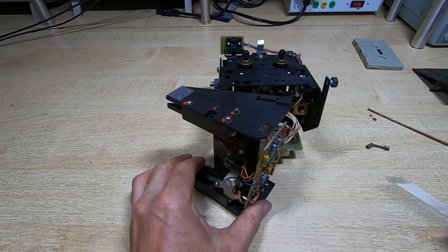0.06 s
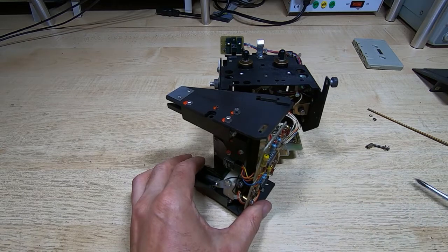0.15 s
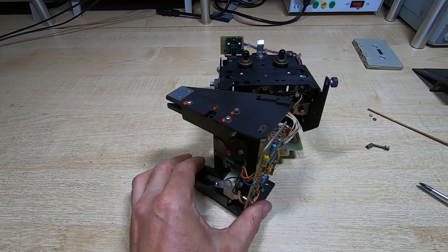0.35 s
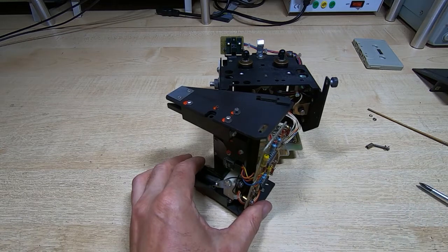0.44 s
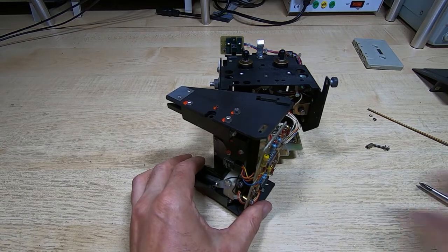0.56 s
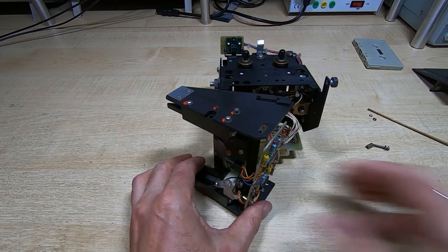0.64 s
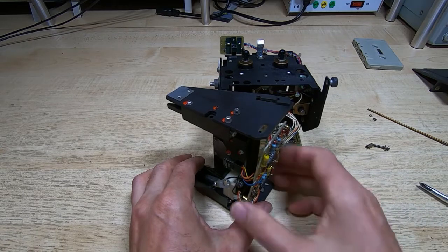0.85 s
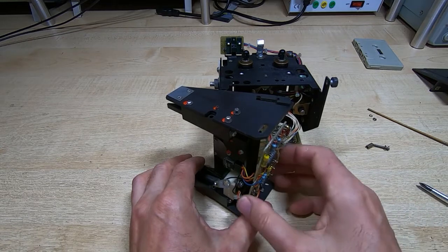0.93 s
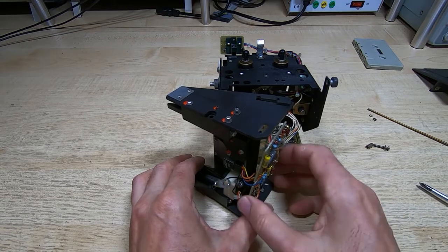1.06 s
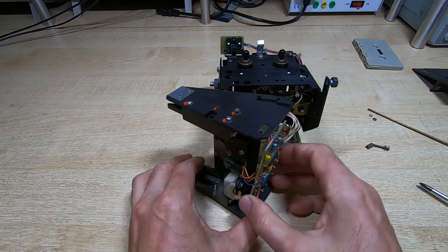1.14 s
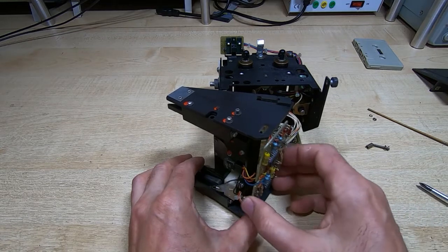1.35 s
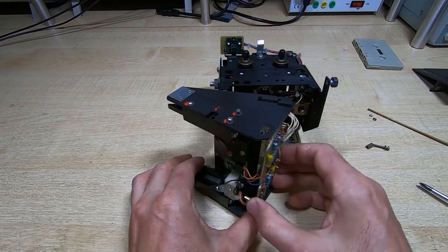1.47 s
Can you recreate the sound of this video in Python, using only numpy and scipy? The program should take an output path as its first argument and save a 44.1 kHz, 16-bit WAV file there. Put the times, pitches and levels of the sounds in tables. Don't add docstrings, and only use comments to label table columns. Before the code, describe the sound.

Close up in a small workshop room, a screwdriver is laid on wood, clicking sharply and then clacking louder. Soft hand rustle follows, with tiny metal ticks and a brief plate rattle over quiet hiss and rumble.

```python
import sys
import numpy as np
from scipy import signal
from scipy.fft import rfft, irfft
from scipy.io import wavfile
from scipy.ndimage import uniform_filter1d

SR = 44100
rng = np.random.default_rng(int(sys.argv[2]) if len(sys.argv) > 2 else 0)


def voltage_ratio(decibels):
    exponent = np.asarray(decibels, float) / 20
    return 10 ** exponent


def transcribe(u):
    v = np.clip(np.atleast_2d(u).T, -1, 1)
    q = np.round(v * 32767).astype(np.int16)
    wavfile.write(sys.argv[1], SR, q)


N = 66150

# (frequency [Hz], level per Hz [dB])
HISS_COLOUR = [(8.8, -22.5), (15, -0.5), (65, -7.5), (179, -15), (483, -22), (1340, -27.5), (1790, -30.5),
               (10000, -37), (16000, -39)]
HISS_DB, HISS_FLICKER_DB = -42.5, -1
HUM_HZ, HUM_DB, HUM_WOBBLE = 50.1, -41, 0.42

# (frequency [Hz], time to fall 60 dB [s])
ROOM_DECAY = [(250, 0.34), (500, 0.29), (1000, .25), (2000, 0.24), (4000, 0.14), (8000, 0.11),
              (16000, 0.12)]
ROOM_RISE_S, ROOM_GRAIN_DB = 0.00064, 3.5

# (time [s], level [dB])
RUSTLE_LEVEL = [(0, -71), (.12, -62), (.2, -55), (.3, -55), (0.552, -70), (.68, -55), (.85, -55.5),
                (.95, -70), (1.08, -57), (1.15, -47.5), (1.22, -64), (1.35, -62), (1.5, -64)]
RUSTLE_HZ, RUSTLE_OCTAVES, RUSTLE_GRAIN_DB = 2340, 1.28, 4

# (time [s], peak level [dB], pitch [Hz], time to fall 60 dB [s], snap level [dB])
PART_TICKS = [(.9232, -35, 3970, 0.006, 0), (1.0497, -33, 3100, 0.003, -5), (1.0822, -45, 7320, .045, -22),
              (1.0972, -41, 3430, 0.054, -18), (1.1022, -36.5, 6730, .028, -4),
              (1.1082, -41, 3440, 0.045, -18), (1.1202, -43, 3420, .045, -14),
              (1.1408, -35, 6720, 0.03, -7), (1.1418, -38, 4340, 0.022, -5), (1.1432, -41, 5310, 0.02, -5),
              (1.1512, -43, 3380, 0.04, -18), (1.1662, -41, 3440, 0.039, -13),
              (1.1702, -40, 1420, 0.037, -18), (1.1737, -33.5, 6480, 0.03, 2),
              (1.1743, -35.5, 10800, .022, -1), (1.1751, -37.5, 2370, 0.031, -2),
              (1.1757, -39, 9250, .022, -7), (1.1766, -38, 5720, .022, -7), (1.1781, -39, 4050, 0.02, 2),
              (1.2342, -40.5, 6510, 0.025, -18), (1.3134, -38.5, 1466, 0.049, -14),
              (1.3256, -41, 7340, 0.081, -24), (1.3762, -46, 3510, .012, 1), (1.4721, -36, 2690, 0.036, -6),
              (1.4728, -29.5, 1402, 0.084, -2), (1.4746, -36, 1570, 0.064, -4),
              (1.4752, -39.5, 2280, 0.051, -4), (1.4762, -40, 640, .12, -4)]
PART_ROOM_DB = -8.5

# (time [s], level [dB])
PLATE_KNOCKS = [
    (1.3146, -29),
    (1.3151, -22),
    (1.3164, -32),
    (1.3184, -24.5),
    (1.3196, -33.5),
    (1.3216, -44),
    (1.3262, -45),
]
# (frequency [Hz], level [dB], time to fall 60 dB [s])
PLATE_TONES = [(840, -11, 0.1), (2250, -13.5, 0.11), (3070, -6.5, 0.033), (3910, -8, 0.025),
               (5190, -4, 0.044), (5530, -5.5, .03), (6230, -8, 0.023), (6800, 4, 0.027),
               (7100, 6.5, 0.047), (7400, -7, 0.12), (8920, -1, 0.017), (10470, -4.5, 0.025),
               (11260, 1, 0.02), (12700, -2, 0.012)]
# (frequency [Hz], level per Hz [dB])
PLATE_CRACK_COLOUR = [(350, -54), (600, -23), (3830, 1.5), (4500, -7), (6920, 4), (8390, -7), (16000, -16)]
PLATE_RING_DB, PLATE_CRACK_DB, PLATE_ROOM_DB, PLATE_CONTACT_S = -13, 0, -10.5, 0.00017

# (time [s], peak level [dB])
BENCH_LANDINGS = [
    (0.2257, -5),
    (0.3556, -2.5),
]
# (time after landing [s], level against landing [dB])
TIP_CHATTER = [
    (0.0126, -8.5),
    (.031, -11),
    (.042, -23.5),
]
# (frequency [Hz], level [dB], time to fall 60 dB [s])
TIP_TONES = [(410, -20, 0.45), (558, -23, 0.21), (1200, -5.5, 0.16), (1290, 0.5, 0.23), (1570, -12, 0.26),
             (1617, -1.5, 0.17), (1706, -6, 0.21), (1990, -3, 0.16), (2450, -13, 0.2), (2370, -22, 0.26),
             (2800, -11, 0.19), (3020, -5, 0.13), (3510, -27, 0.15), (4220, -17, 0.067), (4900, -25, 0.07)]
# (frequency [Hz], level per Hz [dB])
TIP_CRACK_COLOUR = [(120, -51), (200, -24.5), (387, -7.5), (560, -12.5), (760, -26.5), (1560, 0.5),
                    (2130, -15), (2380, -8.5), (13800, -44.5), (16000, -55)]
TIP_RING_DB, TIP_CRACK_DB, TIP_ROOM_DB, TIP_CONTACT_S = -18, -3.5, -7.5, 0.00018
# (frequency [Hz], level [dB], time to fall 60 dB [s])
HANDLE_TONES = [(453.5, -5.5, 0.27), (610, -5, 0.21), (782.4, -4, 0.25), (904, -9, .18), (1017, 6, 0.17),
                (1123, 5, 0.12), (1213, -2, 0.13), (1275, -1.5, 0.26), (1374, -2, 0.28), (1390, -7.5, 0.17),
                (1553, 1.5, 0.18), (1620, -18, 0.075), (1832, -4, 0.19), (1977, -3, 0.16)]
# (frequency [Hz], level per Hz [dB])
HANDLE_CRACK_COLOUR = [(120, -57), (200, -24.5), (370, -17), (470, -7), (1550, -1), (2250, -6.5),
                       (4020, -29.5), (4900, -33), (6640, -41), (16000, -55)]
HANDLE_RING_DB, HANDLE_CRACK_DB, HANDLE_ROOM_DB, HANDLE_CONTACT_S = -18, -4, -6.5, 0.00033
# (time [s], peak level [dB], pitch [Hz], time to fall 60 dB [s], snap level [dB])
SHAFT_RINGS = [(.2257, -6, 2715, .014, -14), (.2258, -15.5, 4950, 0.013, -17),
               (.2259, -21, 7320, 0.014, -25), (.2280, -13, 1700, 0.04, -5), (.2382, -26, 7200, 0.016, -8),
               (.2575, -34, 4900, .03, -13), (.3559, -29, 4790, 0.038, -10), (.3560, -37, 6700, 0.036, -3),
               (.3568, -7.5, 2220, 0.019, -36), (.3612, -22, 1090, .02, -25), (.366, -37, 6500, 0.022, -13),
               (.368, -33, 145, 0.14, -40)]
SHAFT_ROOM_DB = -9


def colour(x, points):
    hz, db = np.array(points, float).T
    grid_hz = np.maximum(np.fft.rfftfreq(8192, 1 / SR), 1)
    gain = voltage_ratio(np.interp(np.log(grid_hz), np.log(hz), db))
    cepstrum = irfft(np.log(gain))
    cepstrum[1:4096] *= 2
    cepstrum[4097:] = 0
    response = irfft(np.exp(rfft(cepstrum)))
    return signal.fftconvolve(x, response)[:len(x)]


def hump(hz, octaves):
    return [(hz * 2 ** (k * octaves), -6.0 * k * k) for k in range(-3, 4)]


def unit(x):
    return x / np.sqrt(np.mean(x ** 2))


def walk(rate):
    hold = int(SR / rate)
    steps = np.repeat(rng.standard_normal(N // hold + 1), hold)
    smooth = uniform_filter1d(uniform_filter1d(steps, hold), hold)[:N]
    return smooth / smooth.std()


def taps(rows):
    x = np.zeros(N)
    for time_s, db in rows:
        x[min(int(time_s * SR), N - 1)] += voltage_ratio(db)
    return x


def fade(t, t60):
    return np.exp(-np.log(1000) * t / t60)


def ring(tones):
    t = np.arange(SR // 2) / SR
    total = np.zeros(len(t))
    for hz, db, t60 in tones:
        total += voltage_ratio(db) * np.sin(2 * np.pi * (hz * t + rng.random())) * fade(t, t60)
    return total


def room():
    t = np.arange(SR // 2) / SR
    grain = rng.standard_normal(len(t)) * voltage_ratio(ROOM_GRAIN_DB * rng.standard_normal(len(t)))
    tail = sum(colour(grain, hump(hz, 0.492)) * fade(t, t60) for hz, t60 in ROOM_DECAY)
    tail = tail * (1 - np.exp(-t / ROOM_RISE_S))
    return tail / np.sqrt(np.sum(tail ** 2))


def knock(rows, tones, crack_colour, ring_db, crack_db, room_db, contact_s):
    crack = colour(taps([(0, 0)])[:SR // 2], crack_colour)
    crack = crack / np.abs(crack).max()
    t = np.arange(len(crack)) / SR
    burst = rng.standard_normal(400) * t[:400] * np.exp(-t[:400] / contact_s)
    crush = signal.fftconvolve(crack, burst)[:len(crack)]
    crush = voltage_ratio(crack_db) * crush / np.abs(crush).max()
    ringing = voltage_ratio(ring_db) * ring(tones) * (1 - np.exp(-t / contact_s))
    echo = voltage_ratio(room_db + 11.5) * signal.fftconvolve(crack, room())[:len(crack)]
    return signal.fftconvolve(taps(rows), crush + ringing + echo)[:N]


def ticks(rows, room_db):
    close = np.zeros(N)
    for time_s, db, hz, t60, snap_db in rows:
        tick = ring([(hz * 0.9, -6, t60), (hz * 1.03, -6, t60)])
        burst = rng.standard_normal(200) * np.exp(-np.arange(200) / 30)
        tick[:200] += voltage_ratio(snap_db) * colour(burst, hump(hz, 1.34))
        close += signal.fftconvolve(taps([(time_s, db)]), tick)[:N]
    return close + voltage_ratio(room_db) * signal.fftconvolve(close, room())[:N]


def background():
    noise = colour(rng.standard_normal(2 * N), HISS_COLOUR)[N:]
    hiss = unit(noise) * voltage_ratio(HISS_DB + HISS_FLICKER_DB * walk(6.7))
    t = np.arange(N) / SR
    drift = 1 + HUM_WOBBLE * (walk(9.1) + 1j * walk(8.4))
    hum = np.imag(drift * np.exp(2j * np.pi * HUM_HZ * t))
    return hiss + voltage_ratio(HUM_DB) * unit(hum)


def rustle():
    grains = rng.standard_normal(N) * voltage_ratio(RUSTLE_GRAIN_DB * np.tanh(walk(60.17)))
    time_s, level_db = np.array(RUSTLE_LEVEL).T
    db = np.interp(np.arange(N) / SR, time_s, level_db, left=-100)
    return voltage_ratio(db) * unit(colour(grains, hump(RUSTLE_HZ, RUSTLE_OCTAVES)))


def chassis():
    parts = ticks(PART_TICKS, PART_ROOM_DB)
    plate = knock(PLATE_KNOCKS, PLATE_TONES, PLATE_CRACK_COLOUR,
                  PLATE_RING_DB, PLATE_CRACK_DB, PLATE_ROOM_DB, PLATE_CONTACT_S)
    return parts + plate


def screwdriver():
    (tip_s, tip_db), handle_landing = BENCH_LANDINGS
    tip_hits = [(tip_s, tip_db)] + [(tip_s + later, tip_db + db) for later, db in TIP_CHATTER]
    tip = knock(tip_hits, TIP_TONES, TIP_CRACK_COLOUR,
                TIP_RING_DB, TIP_CRACK_DB, TIP_ROOM_DB, TIP_CONTACT_S)
    handle = knock([handle_landing], HANDLE_TONES, HANDLE_CRACK_COLOUR,
                   HANDLE_RING_DB, HANDLE_CRACK_DB, HANDLE_ROOM_DB, HANDLE_CONTACT_S)
    return tip + handle + ticks(SHAFT_RINGS, SHAFT_ROOM_DB)


def scene():
    return (background() + rustle() + chassis() + screwdriver())[None]


def band_limit(x):
    return signal.sosfilt(signal.butter(12, 16470, fs=SR, output="sos"), x)


def record(dry):
    low_pass = signal.ellip(8, 0.2, 40, 15900, fs=SR, output="sos")
    mix = signal.sosfilt(low_pass, dry)
    return band_limit(mix)


dry = scene()
out = record(dry)
transcribe(out)
```